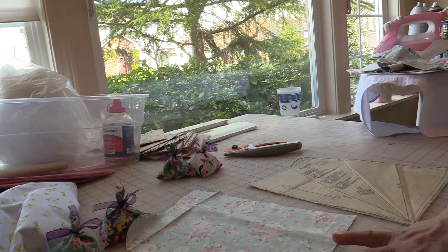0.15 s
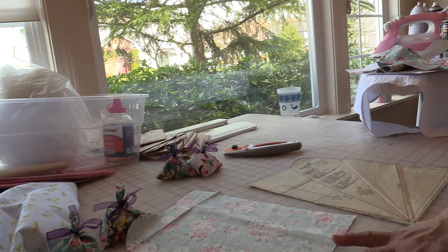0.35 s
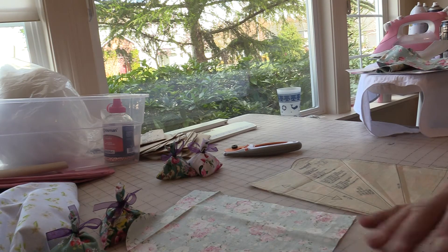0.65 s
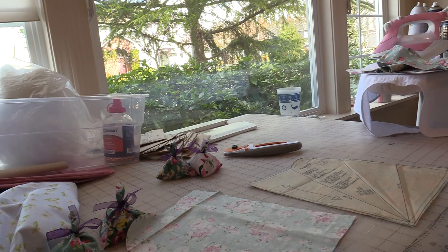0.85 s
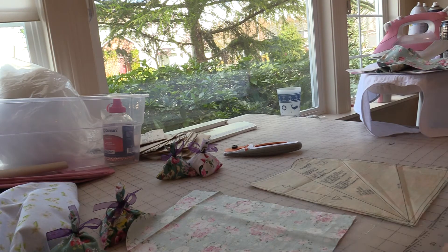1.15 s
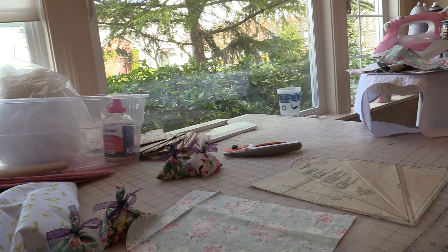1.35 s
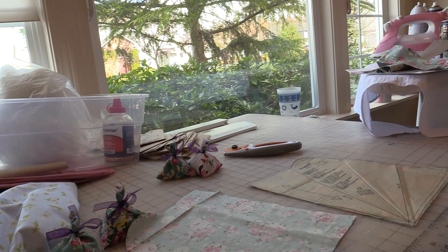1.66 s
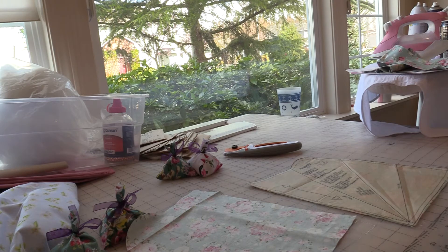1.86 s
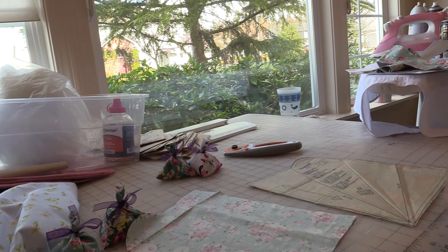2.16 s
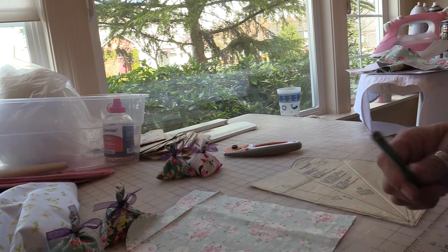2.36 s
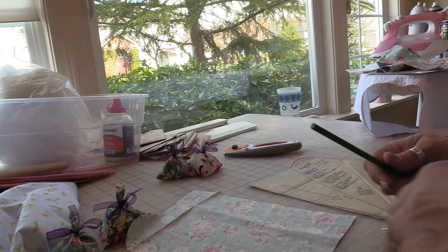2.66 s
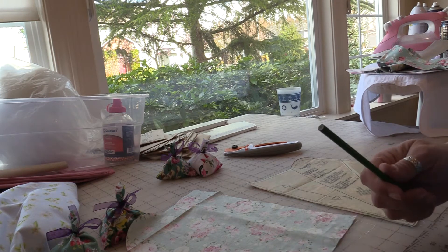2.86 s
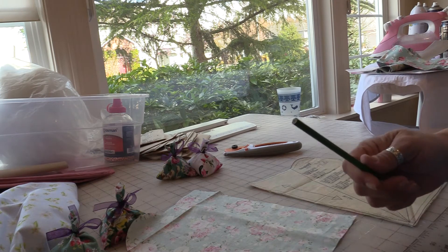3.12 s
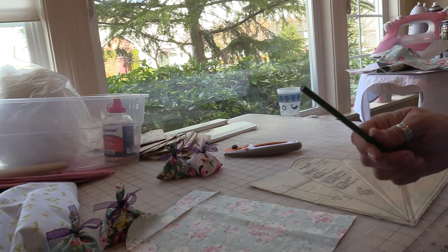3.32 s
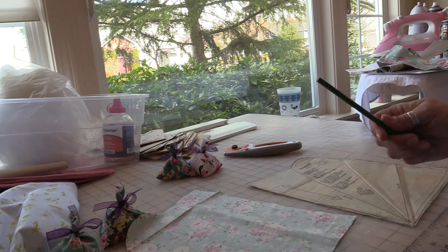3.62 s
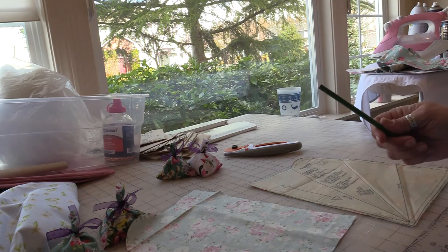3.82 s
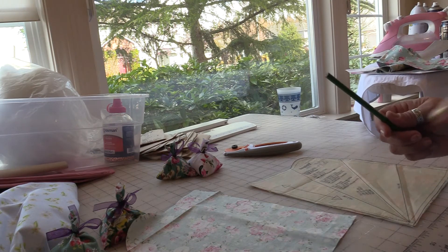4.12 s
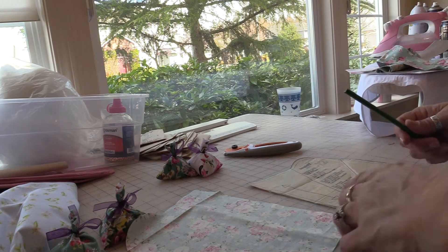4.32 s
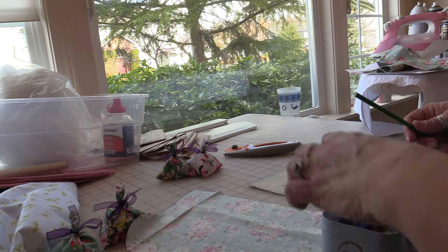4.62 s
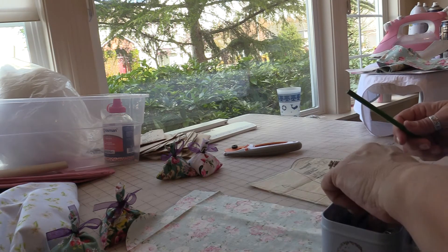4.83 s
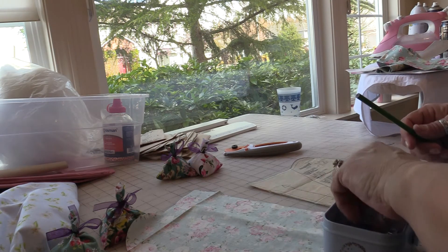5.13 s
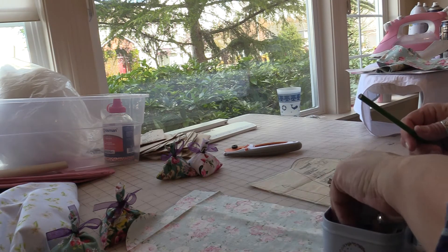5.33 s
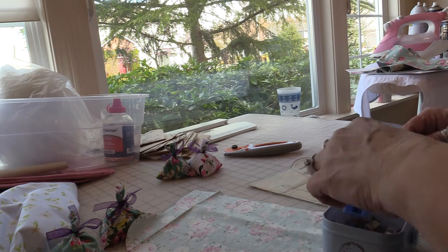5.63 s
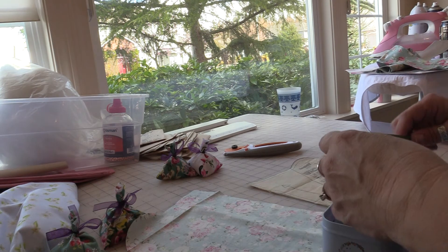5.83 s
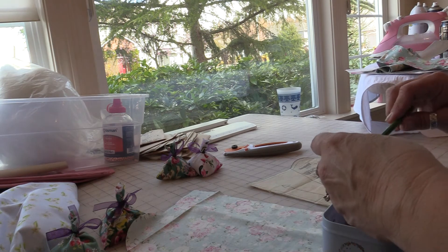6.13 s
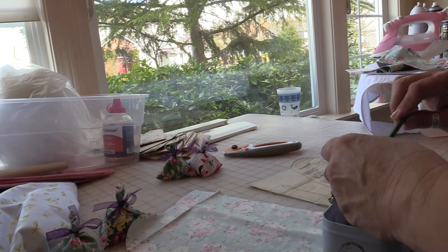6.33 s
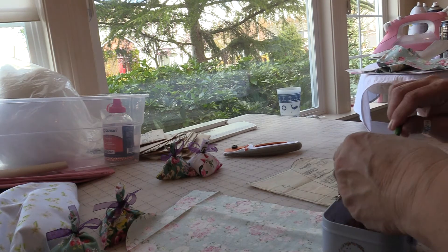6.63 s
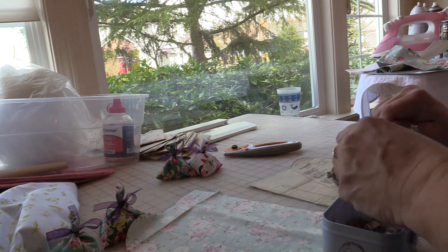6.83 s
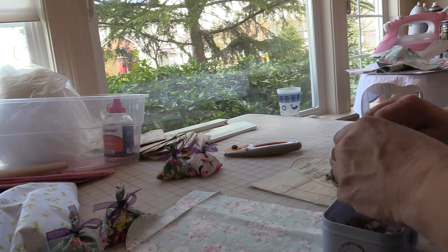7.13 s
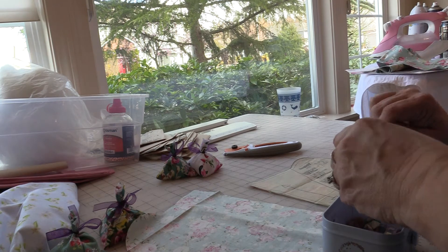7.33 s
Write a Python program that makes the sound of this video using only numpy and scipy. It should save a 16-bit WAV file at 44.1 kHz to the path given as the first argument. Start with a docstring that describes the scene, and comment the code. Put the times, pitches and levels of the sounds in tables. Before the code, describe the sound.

Stereo pickup standing on the table, sounds mostly slightly right. A short slide and hard woody knocks come first, the last one heavy with fading rebounds. Then quiet air, faint brushing and a crisp double click. Later, uneven metallic clinks and scrapes of pencils in a carried tin, loose rattles as it stands, a brief high squeak, and finally light ticks and dry finger rustling. Short room echo, faint hum.

```python
"""A craft table in a small sewing room, heard from a camera standing on it.
Things slide and knock onto the table, one lands and rocks to rest, and a catch snaps in two stages.
A metal tin of pencils is carried in from the right and set down; fingers then rustle among the pencils.
Blows are bursts of tiny contacts passed through the resonances of the struck thing, with partials ringing on.
Slides are uneven clicks over hiss, squeaks are wavering tones; room echoes and quiet air surround it all."""
import sys
import numpy as np
from scipy import signal
from scipy.fft import rfft, irfft
from scipy.io import wavfile
from scipy.ndimage import uniform_filter1d

SR = 44100
rng = np.random.default_rng(int(sys.argv[2]) if len(sys.argv) > 2 else 0)


def generate_wav(signal):
    """Clip the signal to [-1, 1] and save it as 16-bit WAV at the path in sys.argv[1]."""
    frames = np.transpose(np.atleast_2d(signal))
    scaled = np.clip(frames, -1, 1) * 32767
    pcm = np.round(scaled).astype(np.int16)
    wavfile.write(sys.argv[1], SR, pcm)


N = 329576
TIME = np.arange(N) / SR

# room air, its tone colour: (frequency [Hz], relative level per Hz [dB])
AIR_COLOUR = [(15, -58), (25, -17.5), (86, -7), (113, -5), (144, -2), (331, -0.5), (421, -4.5), (631, -2.5),
              (848, -6), (919, -3), (1300, -8), (2230, -8), (4380, -13.5), (8810, -18.5), (15500, -28.5)]
# something light slides over the table: (time [s], length [s], level [dB])
TABLE_SLIDE = [(0, 0.0096, -42.5), (.175, 0.14, -33)]
# things put down on the table: (time [s], level [dB], ring pitch [Hz], ring boost [dB],
# thud [dB], tick [dB], rattle [s], left minus right [dB])
KNOCKS = [ (0.159, -39.5, 2000, 19.5, -19, 3.5, 0.0037, -11),
          (0.185, -14, 2150, 44.5, -22.5, -19.5, 0.0038, -13.5),
          (0.187, -21.5, 360, 26, 2.5, 1.5, 0.00097, -2.5), (0.202, -21, 2130, 13.5, -28, 17.5, 0.057, -2),
          (0.253, -18.5, 1570, 13, 12.5, 24, 0.0031, -13),
          (0.264, -18.5, 2940, 17.5, 8.5, 13.5, 0.0083, -1.5), (0.287, -25.5, 182, 14, 14, -8, 0.03, -1),
          (0.409, -34.5, 1450, 13, -43, -23, 0.0098, -12)]
# broad tone colour of the struck table: (frequency [Hz], level [dB])
TABLE_BODY = [(40, -44), (80, -36), (115, -18.5), (185, -13), (250, -19), (320, -4), (450, -6.5), (600, -9),
              (880, -6), (1600, -7.5), (2800, -13), (4500, -30), (8000, -39), (15000, -53.5)]
# what rings on in the table: (frequency [Hz], level [dB], time to fade by 60 dB [s])
TABLE_MODES = [(120, -25, .4), (192.5, -5, 0.33), (297, 3, 0.22), (328.4, 3, 0.12), (329, -3, 0.28),
               (445.2, 6.5, 0.296), (450, -32.5, 0.41), (506, -7.5, 0.276), (553, -8.5, 0.38),
               (694, -10, 0.26), (900, -24.5, 0.47), (923, -4, 0.395), (1047, -13, 0.56), (1120, -21, 0.42),
               (1170, -22, 0.32), (1567, -9.5, .25), (1790, -5.5, 0.23), (2066, -6, 0.2), (2056, -15, 0.58),
               (2203, -11, 0.38), (2740, -25.5, 0.33), (2910, -17.5, 0.17)]
# a pencil touches another lightly: (time [s], level [dB], ring pitch [Hz])
PENCIL_TICKS = [(0.918, -51, 3150), (4.682, -44.5, 3300), (5.967, -51, 2550), (6.048, -45.5, 2750),
                (6.157, -46.5, 2210), (6.773, -55, 2980), (7.154, -52.5, 3340), (7.316, -58, 3100),
                (7.368, -49, 2010), (7.446, -46.5, 3100)]
# fingers brush over things: (time [s], length [s], level [dB])
BRUSH = [(1.37, .045, -59), (1.68, 0.096, -62)]
# tone colour of the brushing: (frequency [Hz], level [dB])
BRUSH_COLOUR = [(1000, -29), (4000, -22), (8500, 2), (13000, -2.5), (16000, -13)]
# a catch that snaps in two stages: (time [s], level [dB], ring pitch [Hz], ring boost [dB],
# thud [dB], tick [dB], rattle [s], left minus right [dB])
SNAPS = [ (1.8393, -36, 1996, 13, -16, -15, 0.0027, -26), (1.8418, -26, 4200, 3, -13, 1, 0.0035, -5.5),
         (1.8555, -25.5, 2720, 2, -13.5, -11, 0.0014, -32), (1.8594, -37, 2940, 8, 1, 4, 0.00096, 10),
         (1.8645, -37, 2500, 12, 10.5, -13, 0.004, -18)]
# broad tone colour of the catch: (frequency [Hz], level [dB])
SNAP_BODY = [(200, -26), (400, -17.5), (1000, -11), (1400, -16), (2550, -6), (3600, -10), (4100, 0.5),
             (5000, -22.5), (6600, -10.5), (10000, -17), (11000, -14), (13000, -27), (15000, -34)]
# the tin's bottom drones as it is rubbed or nudged: (time [s], length [s], level [dB], pitch [Hz])
DRAG = [(3.389, 0.033, -46, 620), (3.504, 0.055, -43.5, 345), (3.777, 0.013, -37.5, 414),
        (3.933, 0.062, -46.5, 425), (5.782, 0.12, -60.5, 330), (6.277, 0.43, -61.5, 349),
        (7.366, 0.027, -52.5, 357)]
# the pencils slide along the tin's wall: (time [s], length [s], level [dB])
PENCIL_SLIDE = [(3.405, 0.024, -42), (3.465, 0.046, -34.5), (3.6, 0.078, -48), (3.78, 0.025, -42.5),
                (3.965, 0.013, -34), (4.19, 0.079, -36.5), (4.56, 0.025, -32), (4.72, 0.023, -46),
                (4.81, 0.12, -58.5), (4.93, 0.49, -45)]
# pencils swing against the wall of the carried tin: (time [s], level [dB], ring pitch [Hz],
# ring boost [dB], thud [dB], tick [dB], rattle [s], left minus right [dB])
CLINKS = [ (3.429, -16.5, 850, 7.9, -8, -6, 0.0031, -3.5), (3.432, -19.5, 1810, 9, -18, 6, 0.0066, -2),
          (3.537, -25.5, 1280, 17, 7, 7, 0.022, -3), (3.651, -35, 1010, 11, -6, 11.5, 0.0093, 1),
          (3.782, -24, 1150, 9.7, 4.5, -13, 0.029, -4.5), (3.891, -34, 826, 22, -3, 7.5, 0.048, -10),
          (4.017, -17, 2420, 51, -6, 27.5, 0.00089, -34), (4.019, -20, 2540, 40, -7, 24.5, 0.0018, -12),
          (4.021, -33, 826, 28, -9, 13, 0.0025, -10), (4.099, -34.5, 940, 63, 10, -5, 0.0008, -18),
          (4.1835, -18, 820, 17, 8, 6, 0.0016, -5), (4.186, -26, 1280, 14, 7, 4, 0.0015, -5),
          (4.198, -23.5, 980, 8.9, 3.5, 3, 0.014, -2), (4.263, -30, 940, 1.4, -24, 13.5, 0.014, -5)]
# broad tone colour of the struck tin: (frequency [Hz], level [dB])
TIN_BODY = [(40, -58), (110, -35.5), (220, -32.5), (350, -15), (620, -12.5), (820, -4), (980, 1),
            (1400, -5.5), (2100, -3), (3200, -10.5), (4200, -21), (4900, -26.5), (8500, -28), (15000, -48)]
# what rings on in the tin: (frequency [Hz], level [dB], time to fade by 60 dB [s])
TIN_MODES = [(426, -1.5, 0.3), (862, 1, 0.19), (940, 2, 0.38), (964, 13.5, 0.38), (1170, -39, 0.19),
             (1264, -17, .3), (1510, -17, .25), (1670, -26, 0.22), (1794, -4, 0.63), (2050, 21, 0.21),
             (2190, -32, 0.32), (2300, -1, 0.27), (2600, -10, 0.18), (2870, 32, 0.087), (2880, -17, 0.44),
             (3200, -15, 0.15), (3380, -4, 0.091), (3560, -14, 0.13)]
# the bunch of pencils is jolted in the standing tin: (time [s], level [dB], ring pitch [Hz],
# thud [dB], tick [dB], rattle [s])
RATTLES = [ (4.408, -23, 1390, 10, -4, 0.0045), (4.418, -21.5, 1230, 10.5, -7, 0.063),
           (4.491, -24.5, 1450, -2, -29, 0.052), (4.545, -22.5, 910, 11, 2.5, 0.023),
           (4.938, -33, 1250, -5, 4.5, 0.065), (5.054, -27.5, 940, 2.5, -21, 0.018),
           (5.095, -34.5, 930, 1, -20, 0.023), (5.143, -30, 2300, -2, -27, 0.018),
           (5.212, -33, 840, 14.5, -27, 0.013), (5.272, -34.5, 3380, 11, -4, 0.025),
           (5.328, -17, 970, -17, -8.5, 0.022)]
# fingers stir loose pencils: (time [s], length [s], level of a typical clack [dB])
STIRS = [(4.96, .47, -43), (5.659, 0.83, -60.5)]
# a pencil squeaks on the metal: (time [s], length [s], pitch [Hz], level [dB])
SQUEAKS = [(5.027, 0.019, 3420, -47), (5.235, 0.028, 3330, -35.5)]
# fingers rustle among the pencils: (time [s], length [s], level [dB])
RUSTLE = [(5.98, 0.14, -61), (6.53, .2, -64.5), (6.775, 0.031, -43.5), (6.875, 0.088, -43),
          (7.275, 0.0073, -58), (7.37, 0.17, -46)]
# tone colour of the rustling: (frequency [Hz], level [dB])
RUSTLE_COLOUR = [(590, -47), (1000, -32), (1380, -27), (1640, -15.5), (1790, -4), (2110, 1), (2420, -5),
                 (3180, 7), (3570, -5.5), (4490, -12), (5340, -8), (6050, -8), (8340, -4.5), (15500, -21.5)]
# how the room's echo dies away: (frequency [Hz], time to fade by 60 dB [s], level [dB])
ROOM_DECAY = [(120, 0.77, 3), (400, 0.39, 3.5), (1200, 0.42, 0), (2830, 0.34, 0.5), (8000, 0.25, 2),
              (14000, 0.15, 1.5)]
# difference between the two microphones: (frequency [Hz], gain of the difference [dB])
WIDTH = [(100, 1.5), (300, -1.5), (600, 1.5), (1200, 1.5), (2500, -4), (4500, 5), (8000, -2), (15000, 0)]


def undb(db):
    """Turn decibels into a plain gain."""
    return 10 ** (np.asarray(db) / 20)


def unit(x):
    """Scale to energy 1."""
    return x / np.sqrt(np.sum(x ** 2))


def at_hz(points, hz):
    """Read (frequency, value) points on a log-frequency axis."""
    point_hz, value = np.transpose(points)
    return np.interp(np.log(np.maximum(hz, 1)), np.log(point_hz), value)


def colour(x, points):
    """Give a full-length sound a tone colour and scale it to rms 1."""
    gain = undb(at_hz(points, np.fft.rfftfreq(N, 1 / SR)))
    shaped = irfft(rfft(x) * gain, N)
    return shaped / np.std(shaped)


def walk(rate):
    """Wander at random in joined slopes, aiming anew `rate` times a second; spread near 1."""
    step = int(SR / rate)
    stairs = np.repeat(rng.standard_normal(N // step + 1), step)
    return 1.2 * uniform_filter1d(stairs, step)[:N]


def causal(gain):
    """The most compact response that starts at the blow and has this gain at each frequency."""
    cepstrum = irfft(np.log(gain))
    half = len(cepstrum) // 2
    # folding the second half onto the first keeps the response from starting early
    folded = np.r_[cepstrum[0], 2 * cepstrum[1:half], np.zeros(half)]
    return irfft(np.exp(rfft(folded)))


def place(x, pan_db):
    """Share a sound between left and right; pan is left minus right."""
    gains = undb(np.array([[pan_db], [-pan_db]]) / 2)
    return np.sqrt(2) * unit(gains) * x


def two_ears(mid, side, apart_hz):
    """Two noises as sound from all around: alike in the bass, ever less alike in the treble."""
    f = np.fft.rfftfreq(len(side), 1 / SR)
    side = irfft(rfft(side) * f / np.hypot(f, apart_hz), len(side))
    return np.array([mid + side, mid - side])


def strokes(rows, attack_s, release_s):
    """Each stroke swells, holds and dies away; attack and release are the times for 20 dB."""
    gain = np.zeros(N)
    for start_s, length_s, db in rows:
        before = np.maximum(start_s - TIME, 0) / attack_s
        after = np.maximum(TIME - start_s - length_s, 0) / release_s
        gain = np.maximum(gain, undb(db - 20 * np.minimum(before + after, 10)))
    return gain


def friction(gain, body, grain_rate, grain_db, smooth, jerk_db, pan_db):
    """Sliding surfaces catch and slip in tiny uneven clicks (grain_rate a second) over a smooth hiss."""
    clicks = (rng.random(N) < grain_rate / SR) * rng.standard_normal(N)
    slips = clicks * undb(grain_db * np.clip(rng.standard_normal(N), -2, 2))
    jerks = undb(jerk_db * np.clip(walk(60), -1, 1))
    force = (slips / np.std(slips) + smooth * rng.standard_normal(N)) * jerks
    return place(colour(force, body) * gain, pan_db)


def ringing(modes, t, favour):
    """Decaying partials of a struck thing, each as strong as the blow favours it; energy 1."""
    hz, db, t60 = np.transpose(modes)[:, :, None]
    decay = np.exp(-np.log(1000) * t / t60)
    partials = np.sin(2 * np.pi * (hz * t + rng.random(hz.shape))) * decay
    return unit(np.sum(undb(db + at_hz(favour, hz)) / np.sqrt(t60) * partials, axis=0))


def blows(rows, body, modes, modes_db, chatter_db, chatter_rate, ring_q, thud_hz, tick_hz, patchy_db,
          size=16384):
    """Each blow is one contact and a dying chatter; the spot that is hit favours one resonance."""
    out = np.zeros((2, N + size))
    t, f = np.arange(size) / SR, np.fft.rfftfreq(size, 1 / SR) + 1
    for start_s, db, hz, ring_db, thud_db, tick_db, rattle_s, pan_db in rows:
        settle = np.exp(-t / max(rattle_s, 1e-4))
        rebounds = rng.standard_normal(size) * (rng.random(size) < chatter_rate / SR)
        rebounds += 0.098 * rng.standard_normal(size)
        # a clean hit is mostly first contact, a loose one mostly rebounds
        looseness = rattle_s / (rattle_s + 0.0013)
        force = undb(chatter_db) * looseness * unit(rebounds * settle)
        force[0] += 1
        # heavy blows move the whole body, hard ones add a bright tick
        heavy_db = thud_db / (1 + (f / thud_hz) ** 4)
        hard_db = tick_db / (1 + (tick_hz / f) ** 6)
        resonance = 1 + (undb(ring_db) - 1) / np.sqrt(1 + (ring_q * (f / hz - hz / f)) ** 2)
        # every blow has small peaks and dips of its own
        spot_db = patchy_db * np.interp(f, np.linspace(0, SR / 2, 200), rng.standard_normal(200))
        response = causal(resonance * undb(at_hz(body, f) + heavy_db + hard_db + spot_db))
        sound = unit(irfft(rfft(force) * rfft(response)))
        if len(modes):
            # partials build up while the chatter lasts; a blow spent in one resonance leaves them less
            partials = ringing(modes, t, np.c_[f, heavy_db / 2])
            sound += undb(modes_db - 0.23 * ring_db) * partials * (1 - settle)
        start = max(int(start_s * SR), 0)
        # the root makes 0 dB mean rms 1 over 10 ms, before the partials
        out[:, start:start + size] += place(sound, pan_db) * undb(db) * np.sqrt(SR / 100)
    return out[:, :N]


def air(level_db=-57.5, hum_hz=116.0, hum_db=-73):
    """Quiet room noise that swells slightly and slowly, with a faint mains hum."""
    mid = colour(rng.standard_normal(N), AIR_COLOUR)
    side = 0.89 * colour(rng.standard_normal(N), AIR_COLOUR)
    noise = two_ears(mid, side, 470)
    swell = undb(.25 * walk(2))
    hum = undb(hum_db) * np.sin(2 * np.pi * hum_hz * TIME)
    return place(noise * swell * undb(level_db), -1.3) + hum


def table_slide():
    """A light thing rubs over the table, coloured by the table's body."""
    return friction(strokes(TABLE_SLIDE, attack_s=.11, release_s=0.035), TABLE_BODY, grain_rate=1900,
                    grain_db=-0.5, smooth=0.98, jerk_db=7.5, pan_db=-5.0)


def table_blows():
    """Knocks, the heavy landing and the tin's jolts all shake the same table."""
    return blows(KNOCKS + landing() + jolts(), TABLE_BODY, TABLE_MODES, modes_db=-4, chatter_db=14.5,
                 chatter_rate=1200, ring_q=11.5, thud_hz=600, tick_hz=4680, patchy_db=1)


def landing(start_s=0.463, count=3, gap_s=.0238, rock_db=-12, loss_db=2.2):
    """A heavy blow, then evenly spaced rebounds as the thing rocks, each weaker than the last."""
    # same columns as the knocks
    rows = [(start_s, -9, 870, 6, 6.5, 2, 0.01006, -3.5)]
    for k in range(count):
        rows.append((start_s + (k + 1) * gap_s, rock_db - k * loss_db, 485, 13, -1, 2, 0.02, -2))
    return rows


def tin_blows():
    """Pencils strike the tin's wall or each other, singly."""
    return blows(CLINKS + ticks() + stirs(), TIN_BODY, TIN_MODES, modes_db=-7.0, chatter_db=20.5,
                 chatter_rate=1400, ring_q=13.6, thud_hz=734, tick_hz=4500, patchy_db=3.5)


def ticks(ring_db=14, thud_db=-10, tick_db=10, rattle_s=0.0057, pan_db=-4):
    """Light touches between pencils are short, thin and bright."""
    return [(start_s, db, hz, ring_db, thud_db, tick_db, rattle_s, pan_db)
            for start_s, db, hz in PENCIL_TICKS]


def brush():
    """Fingers brushing over things make a dense, high hiss."""
    return friction(strokes(BRUSH, attack_s=0.042, release_s=.06), BRUSH_COLOUR, grain_rate=8400,
                    grain_db=7.0, smooth=2.5, jerk_db=2.0, pan_db=-3.0)


def snap():
    """A catch snaps in two stages: groups of short, bright clicks with no long partials."""
    return blows(SNAPS, SNAP_BODY, [], modes_db=0, chatter_db=7, chatter_rate=3500, ring_q=9,
                 thud_hz=1410, tick_hz=5540, patchy_db=1.5)


def drag(q=12, pan_db=-2):
    """Friction rings the lowest resonance of the tin's bottom; the grip shifts its pitch."""
    out = 0
    for start_s, length_s, db, hz in DRAG:
        drone = signal.lfilter(*signal.iirpeak(hz, q, fs=SR), rng.standard_normal(N))
        stroke = strokes([(start_s, length_s, db)], attack_s=0.0083, release_s=0.015)
        out = out + drone / np.std(drone) * stroke
    return place(out, pan_db)


def pencil_slide():
    """Pencils rub along the tin's wall, coloured by the tin's body."""
    return friction(strokes(PENCIL_SLIDE, attack_s=0.056, release_s=0.05), TIN_BODY, grain_rate=960,
                    grain_db=0.0, smooth=1.0, jerk_db=3.5, pan_db=-5.0)


def tin_rattles(ring_db=9, pan_db=0.0):
    """Jolts of the whole bunch are loose blows on the tin from straight ahead."""
    rows = [(start_s, db, hz, ring_db, thud_db, tick_db, rattle_s, pan_db)
            for start_s, db, hz, thud_db, tick_db, rattle_s in RATTLES]
    return blows(rows, TIN_BODY, TIN_MODES, modes_db=-14, chatter_db=14.0, chatter_rate=550, ring_q=29,
                 thud_hz=720, tick_hz=4660, patchy_db=3.5)


def jolts(pass_db=-21.5, thud_share=0.14, hz=121, ring_db=6, bass_db=27, hard_db=-8, settle_s=0.0047,
          pan_db=1):
    """The standing tin passes each rattle into the table as a soft thud, more for a heavy rattle."""
    return [(start_s, db + pass_db + thud_share * thud_db, hz, ring_db, bass_db, hard_db, settle_s, pan_db)
            for start_s, db, _, thud_db, _, _ in RATTLES]


def stirs(centre_hz=2300, spread_octaves=0.473, scatter_db=3, ring_db=24, thud_db=-6, tick_db=0,
          rattle_s=0.0014, pan_db=-2, count=12):
    """Stirred pencils clack at chance moments, each at a pitch of its own."""
    rows = []
    for start_s, length_s, db in STIRS:
        moments = start_s + length_s * rng.random(count)
        for moment, (force, pitch) in zip(moments, rng.standard_normal((count, 2))):
            hz = centre_hz * 2 ** (spread_octaves * pitch)
            rows.append((moment, db + scatter_db * force, hz, ring_db, thud_db, tick_db, rattle_s, pan_db))
    return rows


def squeaks(waver=0.014):
    """Lacquer sticks and slips on metal: a short unsteady whistle."""
    out = 0
    for start_s, length_s, hz, db in SQUEAKS:
        swell = np.sin(np.pi * np.clip((TIME - start_s) / length_s, 0, 1))
        pitch_hz = hz * (1 + waver * walk(500))
        out = out + undb(db) * swell * np.sin(2 * np.pi * np.cumsum(pitch_hz) / SR)
    return place(out, -1)


def rustle():
    """Fingers among the pencils make very uneven little clicks over hiss."""
    return friction(strokes(RUSTLE, attack_s=0.12, release_s=0.075), RUSTLE_COLOUR, grain_rate=1600,
                    grain_db=10, smooth=1.0, jerk_db=2.5, pan_db=-3.0)


def room(dry, wet_db=-7, early_db=-9, early_s=0.015, gap_s=0.0019, size=32768):
    """Direct sound, quick echoes off the cluttered table, then the tail of the small room."""
    t, f = np.arange(size) / SR, np.fft.rfftfreq(size, 1 / SR)
    field = rfft(two_ears(*rng.standard_normal((2, size)), 970))
    centres_hz = np.array(ROOM_DECAY)[:, 0]
    tail = 0
    # each band overlaps its neighbours and fades at its own speed
    for share, (_, t60, db) in zip(np.eye(len(ROOM_DECAY)), ROOM_DECAY):
        band = at_hz(np.c_[centres_hz, share], f)
        tail = tail + undb(db) * irfft(field * band) * np.exp(-np.log(1000) * t / t60)
    tail = tail * np.clip(t / gap_s - 1, 0, 1)  # silent for gap_s, full after twice that
    early = two_ears(*rng.standard_normal((2, size)), 1100) * t * np.exp(-2 * t / early_s)
    response = np.sqrt(2) * (undb(wet_db) * unit(tail) + undb(early_db) * unit(early))
    return dry + signal.fftconvolve(dry.mean(axis=0)[None], response, axes=1)[:, :N]


def microphones(x, lag_s=.00009, blur_hz=2800):
    """The left microphone hears everything slightly later than the right; the camera body blurs that in the
    treble."""
    f = np.fft.rfftfreq(N, 1 / SR)
    left, right = rfft(x)
    # one lag serves the whole scene and shrinks toward the treble
    left = left * np.exp(-2j * np.pi * f * lag_s / (1 + (f / blur_hz) ** 2))
    mid = (left + right) / 2
    side = (left - right) / 2 * undb(at_hz(WIDTH, f))
    return irfft(np.array([mid + side, mid - side]), N)


def scene():
    """Table, catch, tin and fingers sound in one room, with the air added after the microphones."""
    table = table_slide() + table_blows()
    tin = tin_blows() + tin_rattles() + pencil_slide() + drag() + squeaks()
    fingers = brush() + rustle()
    return microphones(room(table + snap() + tin + fingers)) + air()


def record(dry, top_hz=15850):
    """The camera cannot pass full scale and cuts the top of the treble."""
    low_pass = signal.ellip(10, .1, 80, top_hz, fs=SR, output="sos")
    return signal.sosfilt(low_pass, np.clip(dry, -1, 1))


dry = scene()
out = record(dry)
generate_wav(out)
```